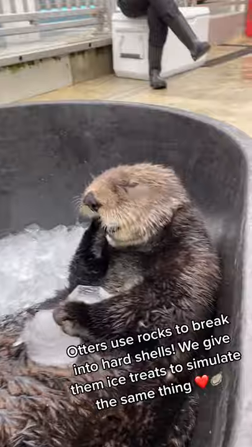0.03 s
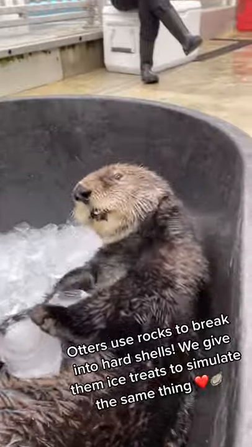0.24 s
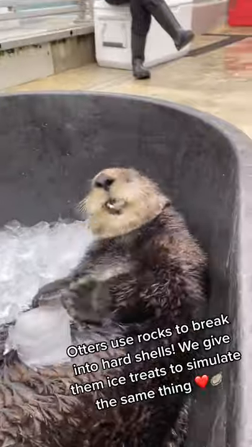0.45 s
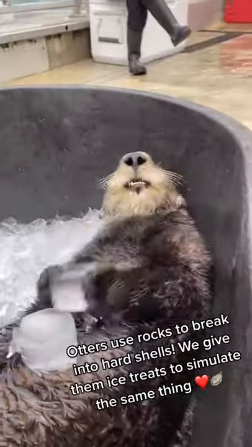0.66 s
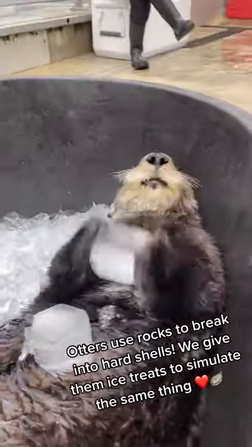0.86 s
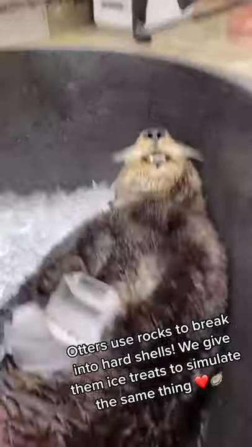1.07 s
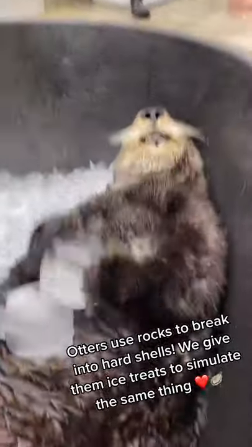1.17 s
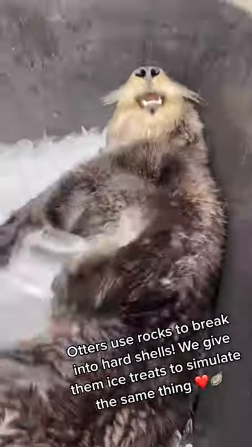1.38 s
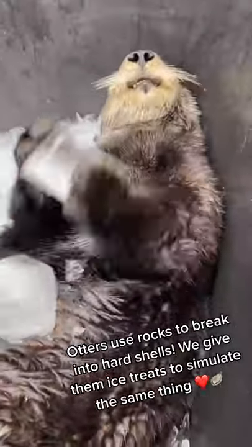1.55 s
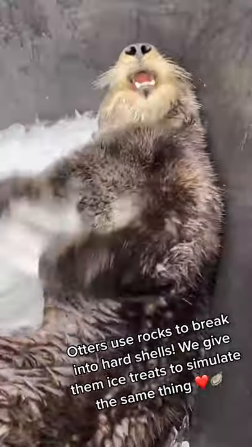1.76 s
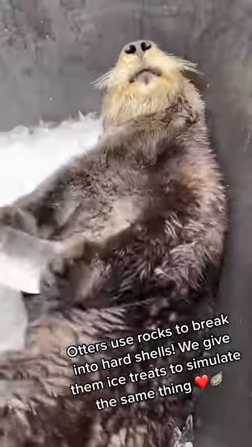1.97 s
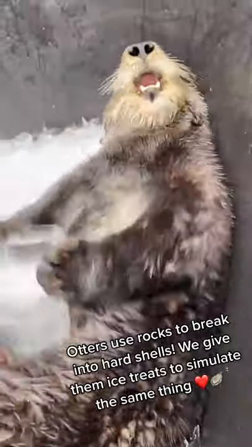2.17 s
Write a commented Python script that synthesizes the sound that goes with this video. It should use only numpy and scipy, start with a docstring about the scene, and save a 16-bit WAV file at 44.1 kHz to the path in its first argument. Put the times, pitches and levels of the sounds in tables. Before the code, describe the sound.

A sea otter cracks one ice block against another four times after rustling crushed ice in a tub

```python
"""In a plastic tub of crushed ice an otter paws about, then knocks an ice block on another four times.
Knocks: quick cracks plus block modes, lows delayed so each sweeps down in pitch; low tub thumps under most.
Chips clack and crunch as pitched rings with bright bursts; clunks glide; a brief scrape rings resonances.
Stirring is dense random grains in bands. Pumps hum behind as wavering tones over shaped noise.
The sound starts abruptly after a short silence."""
import sys
import numpy as np
from scipy import signal
from scipy.fft import rfft, irfft
from scipy.io import wavfile

SR = 44100
rng = np.random.default_rng(int(sys.argv[2]) if len(sys.argv) > 2 else 0)


def master(y):
    """Save y as 16-bit WAV."""
    cut = np.clip(np.atleast_2d(y).T, -1, 1)
    pcm = np.round(cut * 32767)  # scale
    wavfile.write(sys.argv[1], SR, pcm.astype(np.int16))


N = 97902

# Ice block contacts: t/s, level/dB, treble tilt/(dB/octave) about 1 kHz
BLOCK_CONTACTS = [(.9030, -13.5, -5), (0.9187, -16.5, -5), (1.3573, -2.5, -1.5), (1.361, -9.5, 4.5),
                  (1.3718, -13, -0.5), (1.3824, -19, 1.5), (1.6408, -2.5, -1), (1.6475, -4, 1.5),
                  (1.6500, -14.5, 4.5), (1.6583, -10.5, 1), (1.6660, -17.5, 2), (1.8750, -1, 0),
                  (1.8872, -23, 6.5), (1.8890, -8, 1.5), (1.9392, -23, 0), (2.1780, -2, 3), (2.1833, -6, 5),
                  (2.1925, -10, 2), (2.197, -21.5, 2.5)]
# Ice block modes: f/Hz, relative level/dB, t60/s
BLOCK_MODES = [(441, -4.5, 0.018), (648, -1.5, 0.043), (911, 3, 0.027), (1193, -6, 0.049),
               (1600, 6.5, 0.0069), (2600, -9.5, 0.039), (4430, -14, 0.031), (6210, -13.5, 0.011)]
# Colour of a contact: f/Hz, relative level/dB
CRACK_COLOUR = [(200, -48), (330, -4), (600, -0.5), (1000, 1), (2500, -8), (3300, -15), (4300, -18.5),
                (6300, -21.5), (15000, -44)]
# Tub wall thumps: t/s, peak level/dB, f/Hz, t60/s of each of two cascaded resonators
TUB_THUMPS = [(1.363, -26, 94.5, 0.049), (1.646, -25, 150, 0.072), (1.659, -27, 96, 0.069),
              (1.883, -20.5, 77.6, 0.094), (1.892, -23, 134, 0.094)]
# Loose chips: t/s, clack level/dB, ring f/Hz, crunch level/dB, crunch f/Hz
CHIP_CLACKS = [(0.198, -26, 2250, -42, 4200), (.237, -25, 2350, -34.5, 6940),
               (0.281, -26.5, 670, -35.5, 2600), (0.309, -24, 1090, -55, 2920),
               (.341, -20, 1070, -42.5, 3100), (.379, -27.5, 735, -44.5, 2800),
               (0.448, -30, 650, -44.5, 6600), (.533, -19.5, 489, -41, 3800),
               (0.606, -15.5, 1600, -37, 4300), (.613, -28, 1660, -38, 4180),
               (0.655, -24, 1410, -41.5, 4320), (0.7, -21.5, 1080, -44, 2920),
               (.707, -24.5, 720, -42.5, 3480), (.902, -24, 2820, -38.5, 9100),
               (1.062, -47, 2100, -40, 6100), (1.096, -24, 1500, -39, 4550), (1.106, -28, 1700, -42, 2600),
               (1.141, -16, 1370, -39, 4270), (1.163, -16.5, 1210, -38, 4150), (1.189, -24, 915, -43, 2000),
               (1.225, -26, 1070, -57, 2600), (1.337, -27, 1200, -49, 3000),
               (1.459, -26, 1600, -46.5, 4050), (1.481, -17, 1470, -43, 3600),
               (1.493, -19.5, 1490, -49, 3608), (1.534, -23.5, 1020, -47, 2890)]
# Dull gliding clunks: t/s, level/dB, f/Hz, length/s, sag/(share of pitch per length)
DULL_CLUNKS = [(1.230, -34, 720, .05, .5), (1.362, -20, 530, .025, .1), (1.384, -27, 540, .035, 0),
               (1.539, -31, 520, .016, -.12)]
# Paw strokes, interpolated: t/s, level/dB, brightness/(dB/octave) above 1 kHz
STIR_STROKES = [(.2, -47.5, 3), (.38, -46.5, 3.5), (.42, -38, 0.5), (.55, -40.5, 2.5), (0.729, -44, 0.1),
                (0.773, -29.5, 0), (0.817, -29, 2.9), (.89, -30.5, 1.25), (0.937, -31.5, 0.3),
                (0.982, -46, 4), (1.15, -39.5, 1), (1.3, -46, 2), (1.4, -45, 4), (1.62, -50.5, 3.5),
                (2.03, -50, 3), (2.12, -52.5, 5.5), (2.22, -35.5, 0.5)]
# Spectrum of the stirred ice: f/Hz, relative density/(dB per Hz)
STIR_SPECTRUM = [(180, -14), (300, -7), (500, -7), (700, -8), (1150, -16), (2270, -21), (6060, -29),
                 (11000, -42)]
# Resonances of the block dragged over chips: f/Hz at mid stroke, glide/(Hz/s), level/dB
SCRAPE_MODES = [(255, 0, -26), (345, 0, -27), (700, -2600, -33), (2260, 0, -42)]
# Pump tones: f/Hz, level/dB rms before waver, waver/dB
PUMP_TONES = [(59.3, -44.5, 2), (118.2, -43, -3), (147.9, -41, -2)]
# Far pumps and water: f/Hz, relative density/(dB per Hz)
FAR_SPECTRUM = [(30, -15), (60, 4), (205, -4), (247, -3.5), (312, -23.5), (700, -21), (6200, -58),
                (10500, -48), (12500, -79)]
# Stereo width: f/Hz, side minus mid/dB
SIDE_SPECTRUM = [(130, -42), (300, -21), (700, -17), (5000, -12), (9000, -13), (13000, -28)]

SWEEP_1KHZ_S, SWEEP_POWER = .0013, .95  # delay = SWEEP_1KHZ_S * kHz ** -SWEEP_POWER
CRACK_DB, BLOCK_DB, STRIKE_SPREAD_DB = 24.0, -17.0, 4.5
RATTLE_DB, RATTLE_T60_S = -26.0, .03
CHIP_S, CHIP_RISE_S, CHIP_CYCLES, CHIP_ROUGH_DB = .0077, .00059, 10, 5
CRUNCH_PEAK_DB, CRUNCH_WIDTH_HZ, CRUNCH_TOP_HZ = 4.0, 600, 9000
CLUNK_FLUTTER_DB = 4.5
GRAINS_PER_S_AT_1KHZ, GRAIN_SPREAD_DB, GRAIN_CYCLES, CLUMP_DB = 1000, 3.5, 12.0, 2.5
SCRAPE_MID_S, SCRAPE_SIGMA_S, SLIPS_PER_S, SCRAPE_CYCLES = .82, .03, 1200, 30
FAR_DB = -40.5
WALL_T60_S = .092
START_S, LOW_CUT_HZ, TOP_CUT_HZ = .1972, 54, 16800


def from_db(db):
    """dB to gain."""
    return 10 ** (np.asarray(db) / 20)


def rms_one(x):
    """Scale to rms 1."""
    return x / np.sqrt(np.mean(x ** 2) + 1e-20)


def peak_one(x):
    """Scale to peak 1."""
    return x / np.abs(x).max()


def at_hz(points, hz):
    """Interpolate a spectrum table over log frequency."""
    table = np.array(points)
    return np.interp(np.log(hz), np.log(table[:, 0]), table[:, 1])


def coloured(x, points):
    """Filter by a spectrum table."""
    size = 2 ** 17
    hz = np.fft.rfftfreq(size, 1 / SR) + 1  # +1 avoids log(0)
    return irfft(rfft(x, size) * from_db(at_hz(points, hz)))[:N]


def drift(rate_hz):
    """Slow random wander, rms 1: noise through a double low-pass pole."""
    r = np.exp(-2 * np.pi * rate_hz / SR)
    noise = rng.standard_normal(N + SR)
    return rms_one(signal.lfilter([1], [1, -2 * r, r * r], noise)[SR:])


def ring(x, hz, t60_s):
    """Two-pole resonator: a unit click starts a decaying sine of height 1."""
    r = from_db(-60 / (t60_s * SR))
    w = 2 * np.pi * hz / SR
    return signal.lfilter([0, np.sin(w)], [1, -2 * r * np.cos(w), r * r], x + 1e-18)


def clicks(s, gains):
    """One click per event."""
    out = np.zeros(N)
    np.add.at(out, (np.asarray(s) * SR).astype(int), gains)
    return out


def knocks():
    """Contacts crack with a rough tail and strike the modes; lows arrive later than highs, so pitch sweeps down."""
    size = 8192
    out, t = np.zeros(N + size), np.arange(size) / SR
    khz = np.maximum(np.fft.rfftfreq(size, 1 / SR), 50) / 1000
    # phase = integral of the delay over frequency, zero at the top
    q = 1 - SWEEP_POWER
    sweep_cycles = 1000 * SWEEP_1KHZ_S * (khz ** q - khz[-1] ** q) / q
    sweep = np.exp(-2j * np.pi * sweep_cycles)
    for s, db, tilt_db in BLOCK_CONTACTS:
        hit = from_db(RATTLE_DB - 60 * t / RATTLE_T60_S) * rng.standard_normal(size)
        hit[0] = 1
        click = hit * (t == 0)
        modes = np.zeros(size)
        for hz, level_db, t60_s in BLOCK_MODES:
            strike_db = BLOCK_DB + level_db + STRIKE_SPREAD_DB * rng.standard_normal()
            modes += ring(click, hz, t60_s) * from_db(strike_db)
        crack = rfft(hit) * from_db(CRACK_DB + at_hz(CRACK_COLOUR, khz * 1000))
        tilt = from_db(db + tilt_db * np.log2(khz))
        i = int(s * SR)
        out[i:i + size] += irfft((crack + rfft(modes)) * sweep * tilt)
    return out[:N]


def thumps():
    """The tub wall swells and rings low: two equal resonators in cascade."""
    out = np.zeros(N)
    for s, db, hz, t60_s in TUB_THUMPS:
        swell = ring(ring(clicks([s], 1), hz, t60_s), hz, t60_s)
        out += peak_one(swell) * from_db(db)
    return out


def chips():
    """Each chip rings at its own pitch from a rough touch and crunches as a short bright burst."""
    size = 4096
    out, t = np.zeros(N + size), np.arange(size) / SR
    noise = rng.standard_normal((len(CHIP_CLACKS), 2, size))
    bright = signal.butter(3, [1500, CRUNCH_TOP_HZ], "band", fs=SR, output="sos")
    shape = np.minimum(t / CHIP_RISE_S, 1) * np.exp(-(t / CHIP_S) ** 2)
    for (s, db, hz, crunch_db, crunch_hz), (touch_noise, crunch_noise) in zip(CHIP_CLACKS, noise):
        touch = from_db(CHIP_ROUGH_DB) * touch_noise * shape * (CHIP_S * SR) ** -.5
        touch[0] += 1
        clack = ring(touch, hz, CHIP_CYCLES / hz)
        hiss = rms_one(signal.sosfilt(bright, crunch_noise))
        peak = rms_one(ring(crunch_noise, crunch_hz, 2.2 / CRUNCH_WIDTH_HZ))  # bandwidth to t60
        crunch = shape * (hiss + from_db(CRUNCH_PEAK_DB) * peak)
        i = int(s * SR)
        out[i:i + size] += from_db(db) * clack + from_db(crunch_db) * crunch
    return out[:N]


def clunks():
    """Short hollow tones that glide in pitch and flutter in level."""
    t, out = np.arange(N) / SR, np.zeros(N)
    for s, db, hz, length_s, sag in DULL_CLUNKS:
        u = np.maximum(t - s, 0) / length_s
        gain = from_db(db + CLUNK_FLUTTER_DB * drift(53.0))
        shape = 2 * np.sqrt(u) * np.exp(-2 * u ** 2)
        cycles = hz * length_s * u * (1 - sag * u / 2)
        out += gain * shape * np.sin(2 * np.pi * cycles)
    return out


def stirring():
    """Dense small contacts between chips, each ringing a few cycles; level and brightness follow the strokes."""
    t = np.arange(N) / SR
    s, stroke_db, stroke_bright = np.transpose(STIR_STROKES)
    level_db = np.interp(t, s, stroke_db)
    bright_db = np.interp(t, s, stroke_bright)
    sizes = from_db(GRAIN_SPREAD_DB * np.minimum(rng.exponential(1, N), 4)) * rng.choice([-1, 1], N)
    clumps = [drift(22.0) for _ in range(5)]  # shared by neighbouring bands
    out = np.zeros(N)
    for k, hz in enumerate(np.geomspace(190, 11000, 26)):
        root_khz = np.sqrt(hz / 1000)  # band width grows with hz
        born = rng.random(N) < GRAINS_PER_S_AT_1KHZ * root_khz / SR
        grains = rng.permutation(sizes) * born
        band = rms_one(ring(grains, hz, GRAIN_CYCLES / hz)) * root_khz
        clump_db = CLUMP_DB * clumps[k // 2 % len(clumps)]
        treble_db = bright_db * max(np.log2(hz / 1000), 0)
        out += band * from_db(at_hz(STIR_SPECTRUM, hz) + clump_db + treble_db)
    top_cut = signal.cheby2(8, 40, 12300, fs=SR, output="sos")
    return from_db(level_db) * signal.sosfilt(top_cut, out)


def scrape():
    """The block drags over chips: dense uneven slips excite a few resonances, one of them gliding."""
    t, out = np.arange(N) / SR - SCRAPE_MID_S, np.zeros(N)
    for hz, glide, db in SCRAPE_MODES:
        slips = (rng.random(N) < SLIPS_PER_S / SR) * np.exp(2j * np.pi * rng.random(N))
        decay = from_db(-60 * hz / SCRAPE_CYCLES / SR)
        swing = signal.lfilter([1], [1, -decay], slips)
        carrier = np.exp(2j * np.pi * (hz + glide * t / 2) * t)
        out += from_db(db) * rms_one(np.real(swing * carrier))
    return out * np.exp(-(t / SCRAPE_SIGMA_S) ** 2 / 2)


def hum():
    """Motor tones wavering in level and phase over broad far noise."""
    t, tones = np.arange(N) / SR, np.zeros(N)
    for hz, db, waver_db in PUMP_TONES:
        gain = np.sqrt(2) * from_db(db + waver_db * drift(4.3))
        phase = 2 * np.pi * (hz * t + rng.random()) + 1.87 * drift(1.52)
        tones += gain * np.sin(phase)
    far = rms_one(coloured(rng.standard_normal(N), FAR_SPECTRUM))
    return tones + from_db(FAR_DB) * far


def scene():
    """Sources near the centre; short wall reflections, new for each group, enter the sides in opposite sign."""
    t, out = np.arange(2048) / SR, np.zeros((2, N))
    for mid in (knocks() + thumps(), chips() + clunks(), stirring() + scrape(), hum()):
        walls = rng.standard_normal(2048) * from_db(-60 * t / WALL_T60_S)
        walls /= np.sqrt(np.sum(walls ** 2))
        side = coloured(signal.fftconvolve(mid, walls)[:N], SIDE_SPECTRUM)
        out += np.array([mid + side, mid - side])
    return out


def record(dry):
    """Low cut, silence until the start, rounded peaks, top cut."""
    on = np.arange(N) / SR > START_S
    low_cut = signal.butter(2, LOW_CUT_HZ, "high", fs=SR, output="sos")
    top_cut = signal.cheby2(12, 70, TOP_CUT_HZ, fs=SR, output="sos")
    rounded = np.tanh(on * signal.sosfilt(low_cut, dry))
    return signal.sosfilt(top_cut, rounded)


dry = scene()
out = record(dry)
master(out)
```